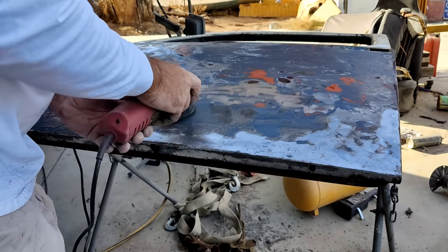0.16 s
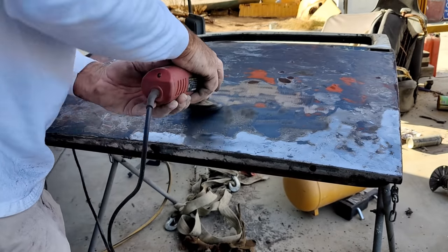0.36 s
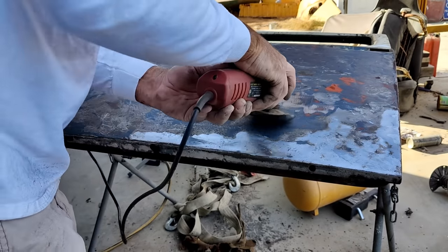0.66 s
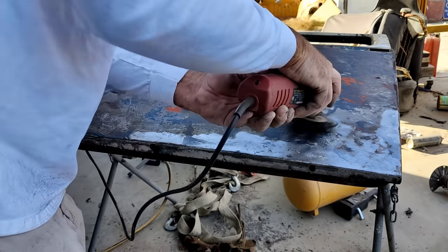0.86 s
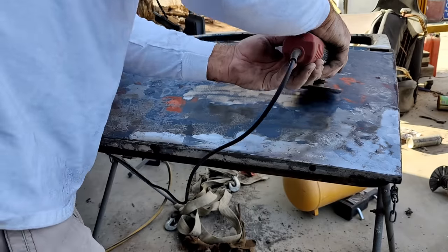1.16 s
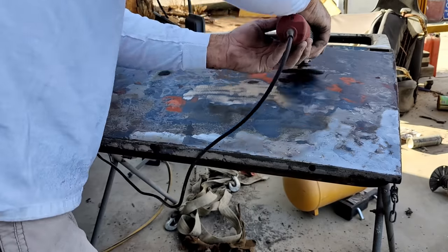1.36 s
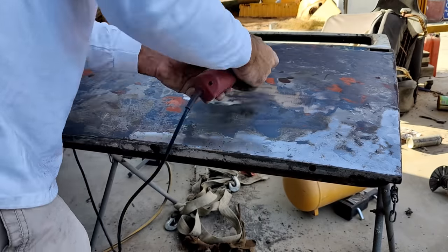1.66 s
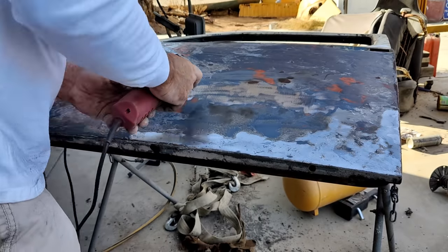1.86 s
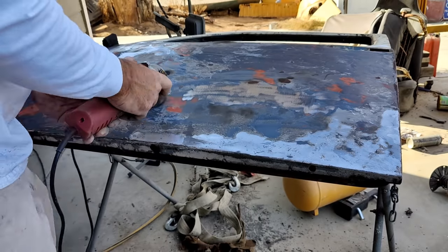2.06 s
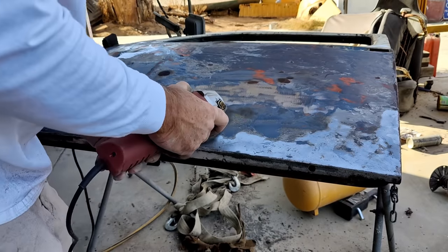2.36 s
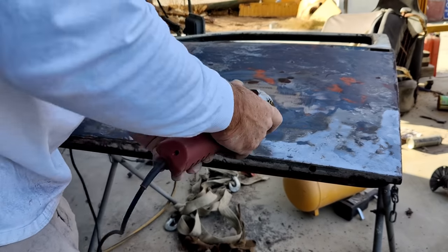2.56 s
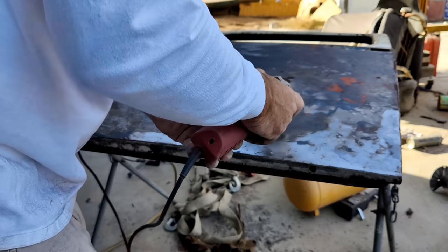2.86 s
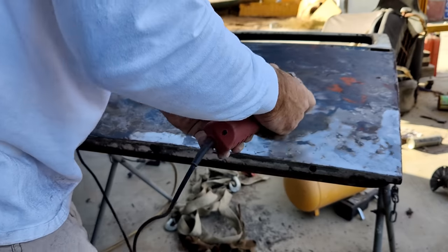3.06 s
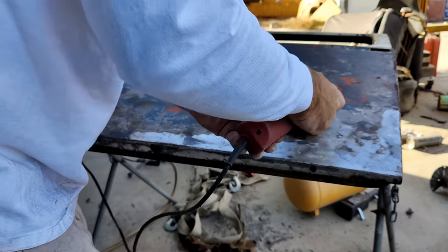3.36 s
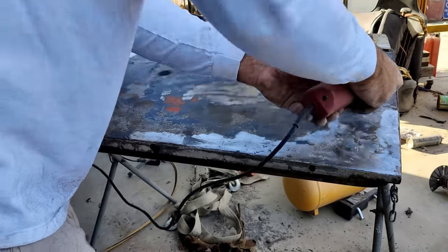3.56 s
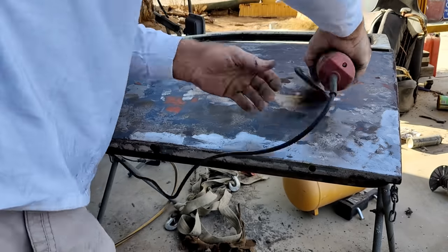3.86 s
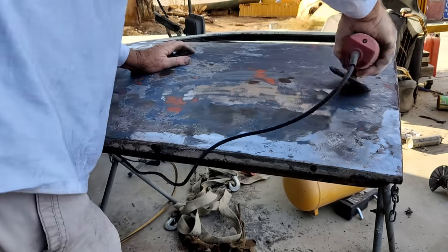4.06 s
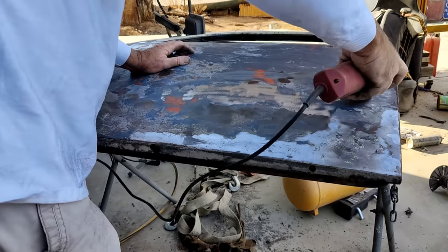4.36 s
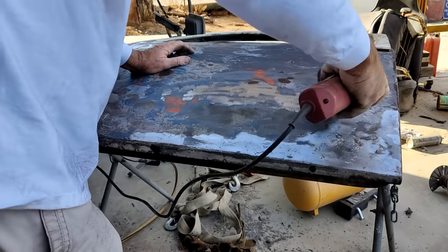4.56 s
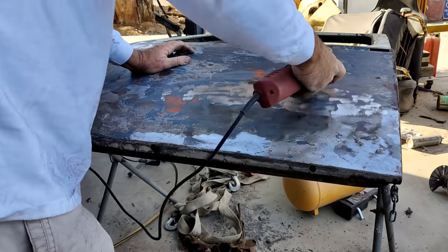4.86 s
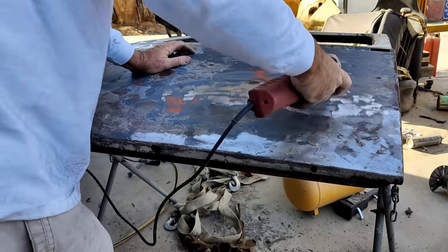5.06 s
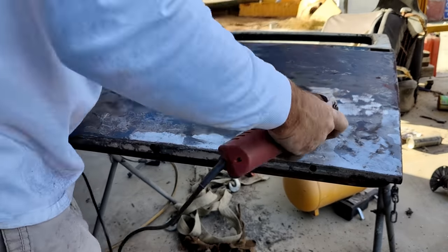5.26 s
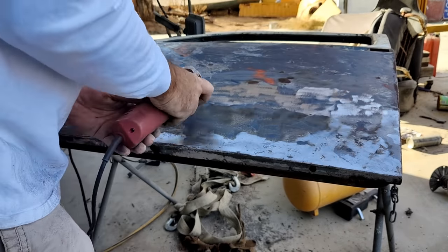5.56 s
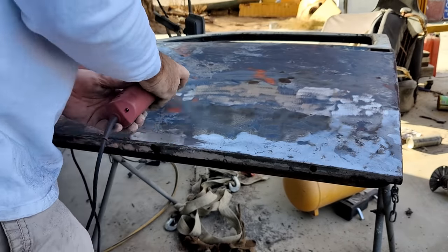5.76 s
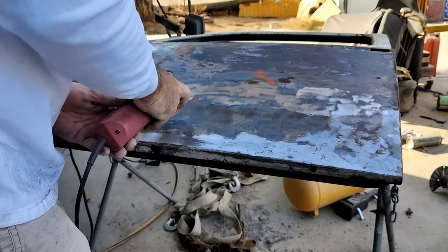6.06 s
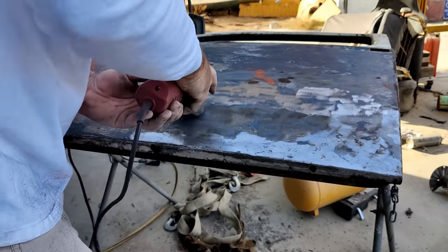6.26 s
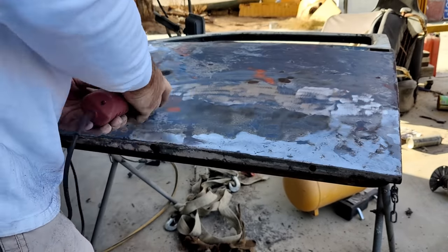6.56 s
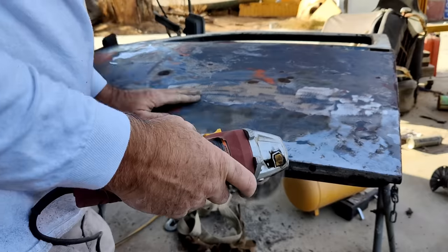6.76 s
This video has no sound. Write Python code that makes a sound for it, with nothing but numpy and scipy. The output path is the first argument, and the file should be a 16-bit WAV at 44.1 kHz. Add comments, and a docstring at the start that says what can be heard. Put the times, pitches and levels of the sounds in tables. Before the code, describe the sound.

A spinning wire brush scours sheet steel with a raspy, wavering whine and hiss, briefly racing when eased, then starting to coast.

```python
"""Wire brush on a steel panel

A hand-held grinder brushes painted steel outdoors; pressure drags its speed down and it races when eased.
The tool buzzes against the panel: wavering overtones over a scrape of wire tips and a motor whine.
Puffs of air thump one microphone port or the other, a far drone sinks, and the tool coasts at the end."""
import sys
import numpy as np
from scipy import signal
from scipy.io import wavfile

SR = 44100
rng = np.random.default_rng(int(sys.argv[2]) if len(sys.argv) > 2 else 0)


def transcribe(signal):
    """Save signal, clipped to [-1, 1], as a 16-bit WAV file at the path in sys.argv[1]."""
    frames = np.atleast_2d(signal).T
    limited = np.clip(frames, -1, 1)
    pcm = np.round(limited * 32767).astype(np.int16)
    wavfile.write(sys.argv[1], SR, pcm)


N = 305613

# How alike the two ports sound: f/Hz, left-right correlation
PORT_LIKENESS = [(60, 0.01), (180, 0.97), (550, 0.94), (1650, 1), (4970, 0.87), (15000, 0.27)]
POWER_OFF_S, CUTOFF_HZ = 6.625, 15600
HOP = 40  # samples per step of the coarse control curves


def from_db(db):
    return 10 ** (np.asarray(db) / 20)


def rms_one(x):
    return x / np.sqrt(np.mean(x ** 2) + 1e-20)


def filtered(x, order, hz, kind):
    return signal.sosfilt(signal.butter(order, hz, kind, fs=SR, output="sos"), x)


def in_time(rows):
    s, *columns = np.transpose(rows)
    return [np.interp(np.arange(N) / SR, s, c) for c in columns]


def at_hz(points, hz):
    freqs, values = np.transpose(points)
    return np.interp(np.log(hz), np.log(freqs), values)


def coarse_time():
    return np.arange(N // HOP + 2) * HOP / SR


def fill_in(coarse):
    return np.interp(np.arange(N) / HOP, np.arange(len(coarse)), coarse)


def coarse_drift(hz):
    """A random wobble: noise through a double one-pole low-pass, rms 1."""
    pole = np.exp(-2 * np.pi * HOP * hz / SR)
    noise = rng.standard_normal(N // HOP + 2002)
    return rms_one(signal.lfilter([1], [1, -2 * pole, pole * pole], noise)[2000:])


def drift(hz):
    return fill_in(coarse_drift(hz))


def bell(t, s, half_s):
    return np.exp(-.5 * ((t - s) / max(half_s, .005)) ** 2)


def panned(x, hz, pan_db):
    """The body between the ports shades the treble more, so it leans further to one side."""
    # Shading: f/Hz, factor on the pan
    lean = [(300, 0.058), (1500, 0.034), (4000, 0.44), (8000, 0.24), (15000, 2.57)]
    gain = from_db(at_hz(lean, hz) * pan_db / 2) * np.ones(N)
    return x * np.array([gain, 1 / gain])


def banded_noise(spectrum, flicker_db, pan_db):
    """Half-octave bands of stereo noise, each with its own level, flicker and width; rms 1."""
    total, shared_flicker = 0, drift(20)
    edges = 250 * 2 ** np.arange(0, 6.1, .5)
    white = rng.standard_normal((2, 2, N))
    for k, (low, high) in enumerate(zip(edges, edges[1:])):
        mid, side = filtered(white[k % 2], 2, [low, high], "band")
        hz = np.sqrt(low * high)
        alike = at_hz(PORT_LIKENESS, hz)
        band = np.sqrt(1 + alike) * mid + np.sqrt(1 - alike) * side * [[1], [-1]]
        level_db = at_hz(spectrum, min(hz, CUTOFF_HZ)) + flicker_db * (.5 * shared_flicker + drift(8.6))
        total += panned(from_db(level_db) * band, hz, pan_db)
    return rms_one(total)


def fading_tone(phase, hz, steady, fade_hz, rasp, rasp_hz):
    """Many paths off the moving tool make a tone fade in and out; a fast random flutter makes it raspy."""
    wander = [coarse_drift(fade_hz) + rasp * coarse_drift(rasp_hz) for _ in range(4)]
    alike = at_hz(PORT_LIKENESS, hz)
    scattered = np.sqrt((1 - steady ** 2) / (1 + rasp ** 2))
    mid = np.sqrt(1 + alike) * (steady * np.sqrt(2) + scattered * (wander[0] + 1j * wander[1]))
    side = np.sqrt((1 - alike) / (1 + rasp ** 2)) * (wander[2] + 1j * wander[3])
    envelope = np.array([fill_in(mid + side), fill_in(mid - side)])
    return np.real(envelope * np.exp(1j * phase)) / np.sqrt(2)


def lifts():
    """The hand eases off: the brush races up smoothly, then sags back more slowly."""
    # Eased pressure: t/s, rise/s, beat rate gained/Hz, beat change/dB
    easings = [(0.221, 0.061, 106, 0.5), (3.832, 0.028, 119, -4.5), (5.239, 0.13, 248, -2),
               (6.209, .056, 155, 3), (6.572, 0.05, 88, -2.5)]
    gained_hz, change_db = 0, 0
    for s, rise_s, gain_hz, beat_db in easings:
        age = np.clip((coarse_time() - s) / rise_s, 0, None)
        shape = (age * np.exp(1 - age)) ** 2
        gained_hz += gain_hz * shape
        change_db += beat_db * shape
    return fill_in(gained_hz), fill_in(change_db)


def beat_rate(gained_hz):
    """Pitch of the buzz, in beats per second: hand drag, lifts, run-down and a judder growing with load."""
    # Buzz under the hand, before the lifts: t/s, beat rate/Hz
    dragged = [(0.0, 873), (0.111, 892), (0.186, 870), (0.251, 915), (0.455, 924), (0.524, 961),
               (0.667, 892), (0.799, 927), (1.081, 921), (1.14, 944), (1.215, 902), (1.281, 944),
               (1.389, 913), (1.449, 919), (1.512, 891), (1.583, 913), (1.649, 858), (1.748, 865),
               (1.799, 826), (1.883, 887), (1.964, 826), (2.05, 867), (2.101, 830), (2.191, 807),
               (2.278, 866), (2.32, 863), (2.35, 880), (2.55, 874), (2.736, 841), (2.817, 859),
               (2.867, 859), (2.897, 832), (2.939, 847), (3.038, 836), (3.074, 820), (3.215, 833),
               (3.316, 859), (3.388, 836), (3.463, 859), (3.505, 842), (3.529, 808), (3.565, 832),
               (3.592, 783), (3.652, 807), (3.679, 782), (3.825, 787), (3.846, 765), (3.867, 801),
               (3.894, 790), (3.918, 762), (3.999, 775), (4.071, 765), (4.146, 828), (4.25, 798),
               (4.31, 829), (4.418, 826), (4.508, 771), (4.559, 787), (4.714, 800), (4.744, 826),
               (4.804, 802), (4.876, 821), (4.96, 872), (4.996, 847), (5.208, 812), (5.295, 853),
               (5.534, 845), (5.603, 873), (5.672, 849), (5.795, 855), (5.837, 824), (5.974, 853),
               (6.043, 856), (6.115, 906), (6.208, 904), (6.232, 934), (6.265, 901), (6.42, 929),
               (6.588, 880), (6.66, 912)]
    free_hz, run_down_hz_per_s, judder = 1000, 2680, .008
    off_s = np.clip(np.arange(N) / SR - POWER_OFF_S, 0, None)
    beat_hz = in_time(dragged)[0] + gained_hz - run_down_hz_per_s * off_s
    load = np.clip(free_hz - beat_hz, 0, None)
    return beat_hz * (1 + judder * load / load.mean() * drift(hz=33.8))


def buzz(beat_phase, mean_hz, top_db, pan_db):
    """The tool buzzes against the panel: a stack of overtones that swell and sink separately."""
    # Overtones of the beat: multiple, level/dB
    overtones = [(1, -26), (2, -21), (3, -7), (4, -8), (5, -9.5), (6, -6.5), (7, -4), (8, -8), (9, -6.5),
                 (10, -11.5), (11, -8), (12, -6), (13, -4), (14, -5), (15, -13.5), (16, -7.5), (17, -18.5),
                 (19, -18)]
    # Passing rises and dips of one overtone: t/s, multiple, change/dB, half length/s
    swells = [(0.11, 1, 1, 0.45), (0.29, 2, 17.5, 0.033), (0.793, 5, 7.5, 0.43), (1.135, 2, 9, 0.21),
              (1.27, 3, 6.5, 0.19), (1.49, 1, -13, 0.14), (1.503, 4, 7, 0.076), (2.088, 1, 5.5, 0.12),
              (2.304, 3, -10.5, 0.055), (2.513, 3, 7, 0.13), (2.554, 1, -11.5, 0.17), (2.498, 4, -2, 0.04),
              (2.552, 5, 4.5, 0.17), (3.098, 1, 7, .08), (3.1, 4, 2, 0.37), (3.4, 4, -15, 0.068),
              (3.903, 2, -2, 0.15), (4.0, 1, 7, 0.068), (3.984, 4, 4, 0.34), (4.265, 1, -13, 0.065),
              (4.634, 1, 11, 0.12), (4.66, 3, -8, 0.1), (4.796, 4, 4.5, 0.5), (5.356, 7, -4.5, 0.063),
              (5.365, 8, -7, 0.03), (5.374, 9, -6, 0.04), (5.369, 4, 9, 0.032), (5.377, 6, -18.5, 0.094),
              (5.425, 3, 7, 0.031), (5.883, 3, 7, 0.085), (5.967, 2, 12.5, 0.12), (6.493, 2, -11, 0.17),
              (6.54, 1, 7, .04), (6.633, 1, -12, 0.029)]
    t, beat = coarse_time(), 0
    for k, level_db in overtones:
        treble = np.clip((k - 7) / 4, 0, 1)
        steady = .78 - .1 * treble  # short waves scatter more
        phase = k * beat_phase + rng.uniform(0, 2 * np.pi)
        tone = fading_tone(phase, k * mean_hz, steady, fade_hz=10.2 + 3.07 * k, rasp=.67, rasp_hz=42.4)
        bumps = (db * bell(t, s, half_s) for s, multiple, db, half_s in swells if round(multiple) == k)
        swell_db = fill_in(sum(bumps, 0 * t))
        beat += panned(from_db(level_db + swell_db + top_db * treble) * tone, k * mean_hz, pan_db)
    return beat


def panel(x):
    """The panel's resonances colour the beat with peaks and notches."""
    # Panel resonances: f/Hz, width/Hz, gain/dB
    resonances = [(944, 32, -12.5), (1370, 47, 3), (2035, 19, 12), (2220, 990, -8.5), (2684, 23, 5),
                  (3658, 20, 6.5), (4347, 25, 8), (5020, 57, 4.5), (5940, 37, -2), (6400, 53, 11),
                  (8700, 98, -13.5)]
    for hz, width_hz, gain_db in resonances:
        gain, damping = from_db(gain_db / 2), np.pi * width_hz / SR
        tuning = -2 * np.cos(2 * np.pi * hz / SR)
        x = signal.lfilter([1 + damping * gain, tuning, 1 - damping * gain],
                           [1 + damping / gain, tuning, 1 - damping / gain], x)
    return x


def sheet_ring(x):
    """The steel's countless close modes smear glides with a short tail; one cluster clangs on."""
    sheet_t60_s, clang_t60_s = .15, .36
    t = np.arange(int(.5 * SR)) / SR
    decays = from_db(-60 * t / [[sheet_t60_s], [sheet_t60_s], [clang_t60_s]])
    mid, side, clang = rng.standard_normal((3, len(t))) * decays
    side = filtered(side, 1, 6000, "high")  # the tail is wide only in the treble
    sheet = filtered([mid + .21 * side, mid - .13 * side], 1, [1630, 7300], "band")
    clang = filtered(clang, 2, [2860, 3040], "band")
    tail = (from_db(-4) * sheet + from_db(-3) * clang) / np.sqrt(np.sum(mid ** 2))
    return x + signal.fftconvolve(x, tail, axes=1)[:, :N]


def wire_scrape(beat_phase, pan_db):
    """Wire tips scratch the panel in a hiss that pulses with each beat."""
    # Scrape spectrum: f/Hz, relative density/dB
    spectrum = [(300, -24), (900, -23), (1230, -18.5), (1420, -5), (1800, -26.5), (2800, -23), (4400, -11),
                (6000, -14.5), (8500, -12.5), (10700, -1.5), (15500, -5)]
    swish = 1 + .61 * np.cos(beat_phase)
    return swish * banded_noise(spectrum, flicker_db=2.4, pan_db=pan_db)


def motor_whine(beat_phase, mean_hz, pan_db):
    """The motor sings at a multiple of the beat rate, swaying slightly in level."""
    multiple = 18
    tone = fading_tone(multiple * beat_phase, multiple * mean_hz,
                       steady=.85, fade_hz=12, rasp=1, rasp_hz=60)
    level_db = -44 + .8 * drift(hz=3.8)
    return panned(from_db(level_db) * tone, multiple * mean_hz, pan_db)


def grinder():
    """Buzz, scrape and whine ride one beat phase and die quickly once the power is off."""
    # Brush contact: t/s, beat/dB, shift of the top overtones/dB, scrape/dB, leftward pan/dB
    contact = [(0.0, -47.5, -3.5, -53, 2.5), (0.94, -53, 0.5, -53.5, 5), (1.62, -49, -1.5, -55, 2.5),
               (2.21, -50.5, -1.5, -55, 2.5), (2.36, -48, -4.5, -55.5, 3), (3.11, -50.5, -0.5, -54.5, 2.5),
               (3.48, -51, -1, -57.5, 2.5), (3.56, -53, -12, -52, 2.5), (3.63, -49, -5, -56, 4),
               (4.09, -50, -3, -54.5, 2.5), (4.22, -51, 1.5, -55.5, 2), (4.55, -51, -5.5, -55, 4.5),
               (4.98, -48, 1, -56.5, 1), (5.24, -46.5, -8, -52, 2), (5.35, -44, -4, -55.5, 2.5),
               (5.88, -48.5, -3.5, -53.5, 2), (6.19, -45, -7.5, -52.5, 1), (6.25, -50.5, -4, -55, 2),
               (6.62, -46.5, -3, -54.5, 4)]
    beat_db, top_db, scrape_db, pan_db = in_time(contact)
    gained_hz, lift_db = lifts()
    scrape_db += .5 * gained_hz / 100  # a racing brush scrapes more and its beat dulls
    top_db -= gained_hz / 100
    beat_db += lift_db + 1.5 * drift(hz=15)  # the bite wavers
    racing_hz_per_s = np.clip(np.gradient(gained_hz) * SR, 0, None)
    beat_db -= .5 * racing_hz_per_s / 1000
    beat_hz = beat_rate(gained_hz)
    beat_phase = 2 * np.pi * np.cumsum(beat_hz) / SR
    beat = from_db(beat_db) * buzz(beat_phase, beat_hz.mean(), top_db, pan_db)
    scrape = from_db(scrape_db) * wire_scrape(beat_phase, pan_db)
    whine = motor_whine(beat_phase, beat_hz.mean(), pan_db)
    off_s = np.clip(np.arange(N) / SR - POWER_OFF_S, 0, None)
    running = from_db(-500 * off_s)
    return sheet_ring(panel(running * beat)) + running * whine + running ** .5 * scrape


def air_puffs():
    """Short pushes of air thump one port and sag back through the capsule vent."""
    # Strong puffs: t/s, peak before the sag/dB, port (-1 left, +1 right)
    strong_puffs = [(0.168, -54.5, 1), (0.366, -50, 1), (0.533, -57, 1), (0.641, -53, -1),
                    (0.762, -51.5, 1), (0.933, -51, 1), (1.18, -47, 1), (1.302, -51, 1), (1.345, -52, 1),
                    (1.5, -47, 1), (1.528, -48.5, 1), (1.695, -53.5, 1), (1.74, -45.5, 1), (1.984, -57, 1),
                    (2.342, -51.5, 1), (2.695, -51, 1), (2.752, -53.5, 1), (2.874, -52, 1), (2.974, -46, 1),
                    (3.102, -51, 1), (3.204, -48, 1), (3.311, -56, 1), (3.477, -51, -1), (3.495, -52, 1),
                    (3.822, -54, 1), (3.927, -52, 1), (3.972, -52, 1), (4.024, -50, 1), (4.056, -51, 1),
                    (4.142, -51, -1), (4.215, -51, -1), (4.256, -49, -1), (4.316, -49.5, -1),
                    (4.377, -48.5, -1), (4.406, -51, 1), (4.438, -50, 1), (4.939, -52, 1), (4.991, -55, 1),
                    (5.158, -56, 1), (5.528, -53, 1), (6.286, -51.5, -1), (6.419, -47, 1), (6.562, -54, 1)]
    rise_ms, sag_hz, leak = 1.94, 21.2, .03
    weak_per_s = 28 * np.array([[.3], [.7]])  # left, right
    age = np.arange(int(.02 * SR)) / (rise_ms * SR / 1000)
    push = age * np.exp(1 - age)  # quick rise, slower fall
    strong = np.zeros((2, N))
    for s, peak_db, port in strong_puffs:
        strong[int(port > 0), round(s * SR) - np.argmax(push)] = -from_db(peak_db)
    t = np.arange(N) / SR
    lull = (t > 4.9) & (t < 6.25) | (t > POWER_OFF_S)
    arrivals = rng.random((2, N)) < weak_per_s / SR
    weak = arrivals * -from_db(-63.5 - 11 * lull + 4.5 * rng.standard_normal((2, N)))
    pressure = signal.fftconvolve(strong + leak * strong[::-1] + weak, push[None], axes=1)[:, :N]
    return filtered(pressure, 2, sag_hz, "high")


def wind():
    """Each port has its own lumpy rumble of wind, swelling in gusts."""
    # Gusts on the ports: t/s, peak/dB, half length/s
    gusts = [(2.102, -82, 0.25), (3.534, -64.5, 0.016), (3.658, -69.5, 0.041), (4.204, -82, .3),
             (4.644, -83, 0.071), (5.005, -95, .2), (5.875, -73, 0.058), (6.808, -71, 0.037),
             (6.856, -52, 0.0086), (6.92, -55, 0.025)]
    rumble = filtered(rng.standard_normal((2, N)), 2, [60, 330], "band")
    lumps = from_db([4 * drift(hz=25) + 5, 4 * drift(hz=25)])  # the left port faces the wind
    gusting = fill_in(sum(from_db(db) * bell(coarse_time(), s, half_s) for s, db, half_s in gusts))
    return (from_db(-87) + gusting) * rms_one(rumble * lumps)


def far_drone():
    """A distant machine winds slowly down."""
    # Sinking hum: t/s, f/Hz, level/dB
    glide = [(3.7, 614, -100), (4.1, 572, -87.5), (4.5, 551, -73.5), (4.9, 529, -76.5), (5.4, 503, -88),
             (6.2, 493, -92.5), (6.93, 494, -91)]
    hz, level_db = in_time(glide)
    return np.sqrt(2) * from_db(level_db + 2 * drift(hz=16)) * np.sin(2 * np.pi * np.cumsum(hz) / SR)


def coasting():
    """The fan hisses on, loose gear teeth chop its treble, and a thin whistle falls as the rotor slows."""
    # Coasting tool: t/s, hiss/dB, tick rate/Hz
    coast = [(6.6, -82, 120), (6.67, -53, 147), (6.72, -48.5, 106), (6.79, -48, 170), (6.87, -49, 180),
             (6.93, -54, 200)]
    # Fan hiss spectrum: f/Hz, relative density/dB
    spectrum = [(900, -25.5), (1400, -34), (2900, -28), (4400, -22.5), (6000, -15.5), (8100, -15),
                (11000, -7), (14100, -5.5), (15500, -10)]
    # Rotor whistle: t/s, f/Hz, level/dB
    glide = [(6.83, 15300, -90), (6.85, 15000, -68), (6.89, 12900, -65), (6.91, 12000, -90)]
    hiss_db, tick_hz = in_time(coast)
    cycle = np.cumsum(tick_hz * (1 + .11 * drift(hz=41))) / SR
    ticks = (.5 + .5 * np.cos(2 * np.pi * cycle)) ** 4 * from_db(2 * drift(hz=60))
    hiss = banded_noise(spectrum, flicker_db=0, pan_db=4)
    body = filtered(hiss, 2, 11500, "low") * (.85 + .3 * ticks)
    top = filtered(hiss, 2, 11500, "high") * (.8 + .9 * ticks)
    hz, whistle_db = in_time(glide)
    whistle = from_db(whistle_db) * np.sin(2 * np.pi * np.cumsum(hz) / SR)
    started = np.arange(N) / SR > coast[0][0]
    return started * (whistle + from_db(hiss_db) * (body + top))


def scene():
    return grinder() + coasting() + air_puffs() + wind() + far_drone()


def record(dry):
    """The top is cut steeply."""
    return signal.sosfilt(signal.ellip(12, .5, 80, CUTOFF_HZ, fs=SR, output="sos"), dry)


dry = scene()
out = record(dry)
transcribe(out)
```